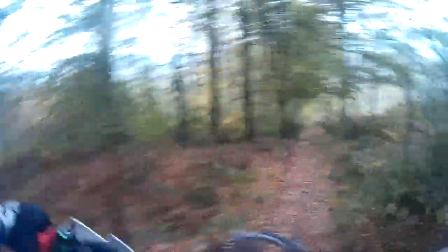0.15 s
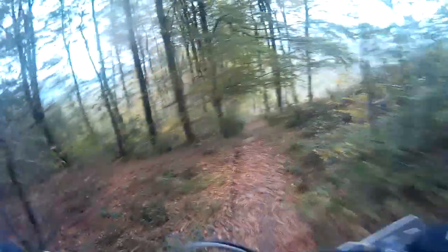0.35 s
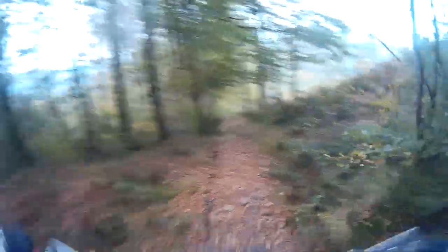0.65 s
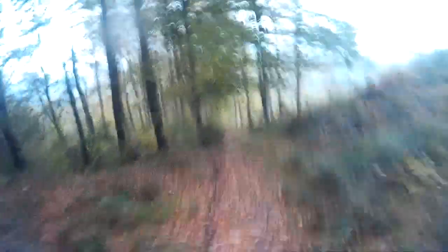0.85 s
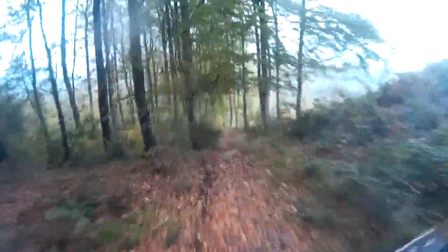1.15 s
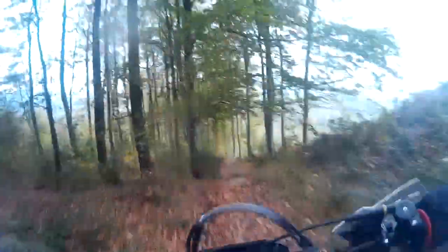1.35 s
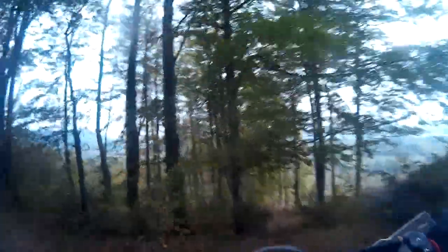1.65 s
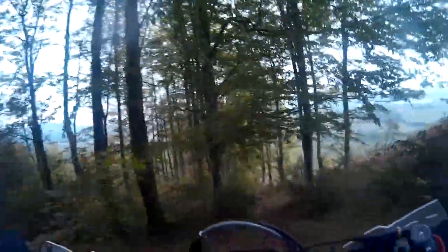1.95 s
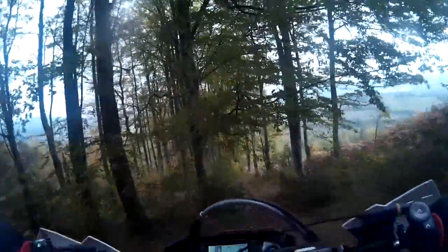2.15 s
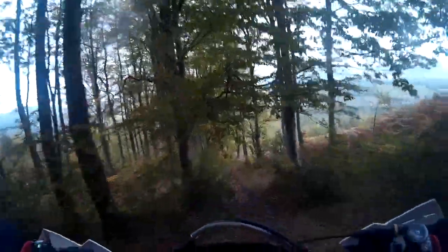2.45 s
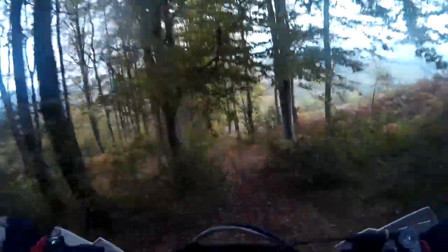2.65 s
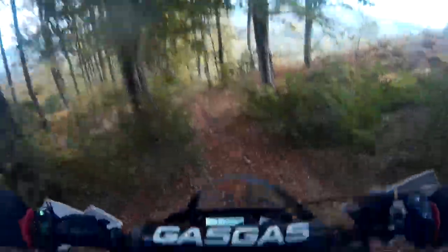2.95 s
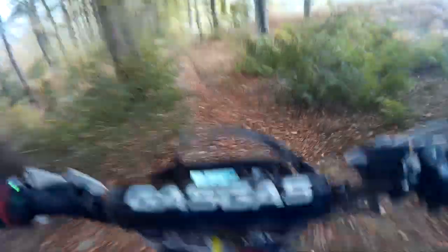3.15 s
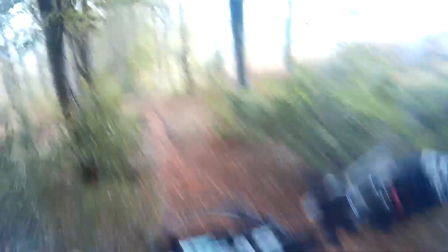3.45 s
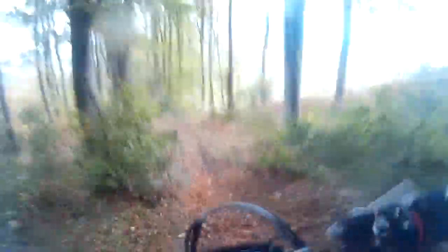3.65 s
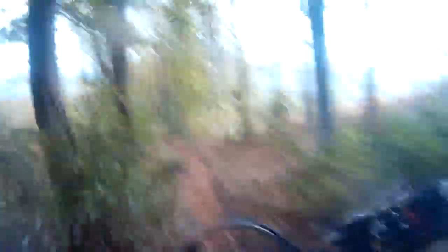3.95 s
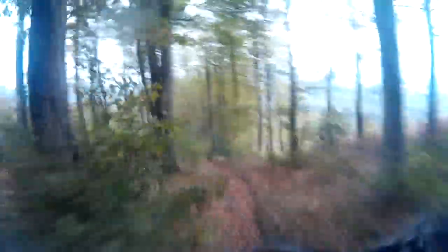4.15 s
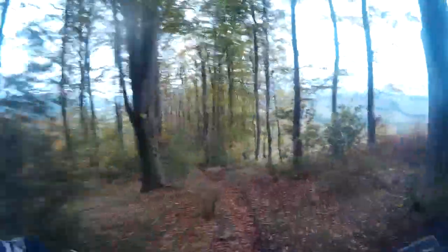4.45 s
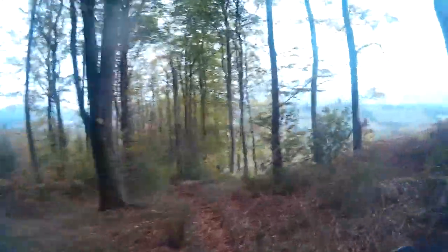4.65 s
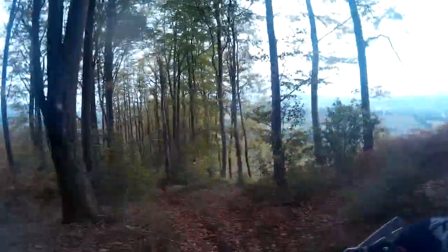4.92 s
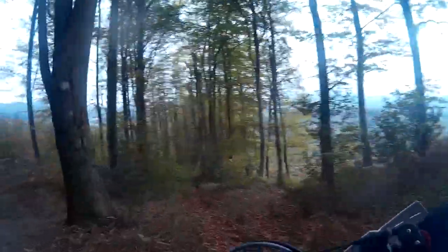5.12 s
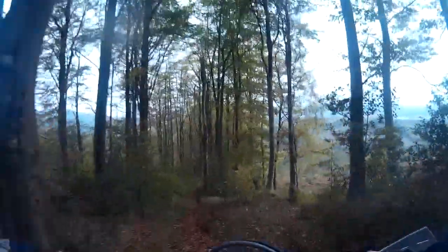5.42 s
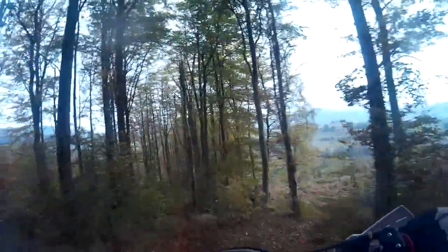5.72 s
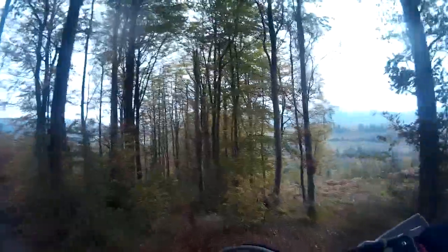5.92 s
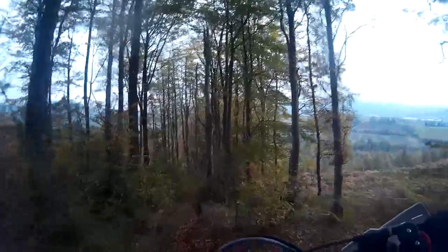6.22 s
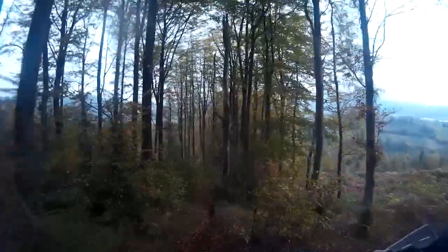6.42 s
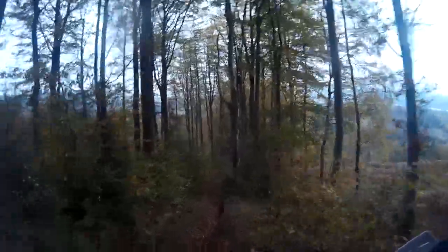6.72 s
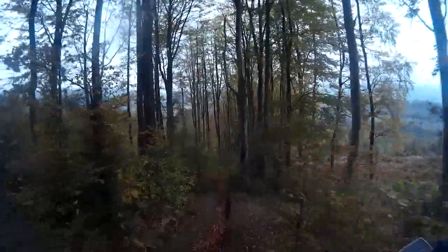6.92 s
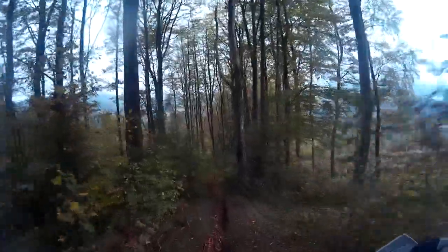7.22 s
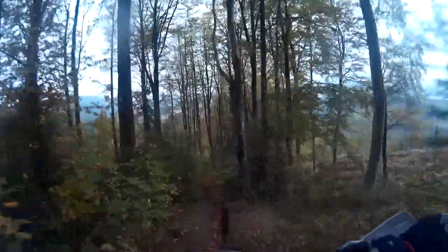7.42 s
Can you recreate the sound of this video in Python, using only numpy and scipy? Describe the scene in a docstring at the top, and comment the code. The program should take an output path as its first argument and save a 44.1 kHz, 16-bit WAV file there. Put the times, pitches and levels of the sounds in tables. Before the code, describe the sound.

Ringing, puffing dirt bike engine at low revs, heard from the helmet, with tyre rumble and short knocks over bumps.

```python
"""A two-stroke dirt bike rings and puffs at low revs, rolling down a woodland trail. Each firing rings
metallically; a dull exhaust puff follows half a turn later. It is heard from a helmet camera in a closed case
that passes mostly a band near 1.3 kHz. Tyres rumble and crunch over soil and leaves, bumps knock and jolt the
case, and the bike groans once in a dip. Early on the engine surges briefly with a rasp, its ring swelling into
brief squeals; later something scrapes once."""
import sys
import numpy as np
from scipy import signal
from scipy.fft import rfft, irfft, next_fast_len
from scipy.io import wavfile

SR = 44100
rng = np.random.default_rng(int(sys.argv[2]) if len(sys.argv) > 2 else 0)


def wrap_up_sound(samples):
    """Save the sound to the file named by the first command line argument, as 16-bit audio."""
    columns = np.atleast_2d(samples).T
    # keep every value between -1 and 1, then stretch to whole-number steps
    tamed = np.clip(columns, -1, 1)
    steps = np.round(tamed * 32767).astype(np.int16)
    wavfile.write(sys.argv[1], SR, steps)


N = 334229
TIME = np.arange(N) / SR

# Crank speed, one firing a turn. Each row: time in seconds, turns per second.
CRANK_SPEED = [(0.0, 28.0), (0.6, 26.32), (0.77, 25.24), (1.1, 31.28), (1.58, 33.1), (1.77, 31.96),
               (2.08, 33.23), (2.72, 27.44), (3.37, 33.44), (3.88, 32.5), (4.39, 36.63), (4.83, 36.64),
               (5.02, 38.6), (5.81, 40.71), (6.29, 36.18), (6.54, 35.11), (6.89, 31.36), (7.58, 33.48)]
# Resonances of the struck case. Each row: centre in Hz, width in Hz, relative gain in dB.
CASE_MODES = [(98, 90, 4), (271, 186, 7), (443, 170, -8.5), (569, 72, -2.5), (727, 64, -3),
              (1060, 620, -2.5), (1408, 150, 7), (1650, 420, 1), (1775, 56, 6.5), (1910, 59, 1.5),
              (2150, 990, -7), (2960, 420, -14.5), (4010, 410, -7), (4640, 450, -14.5), (5640, 680, -16),
              (9350, 3000, -13)]
# Bumps in the trail. Each row: pressure crest in seconds, peak in dB, swing rate in Hz.
BUMPS = [(0.791, -39, 16), (0.881, -41.5, 16), (1.257, -38.5, 18), (2.767, -24, 104), (3.33, -41, 62),
         (3.542, -34.5, 33), (3.88, -40.5, 19), (4.697, -38, 14), (5.02, -39, 26), (5.306, -36.5, 18),
         (6.047, -42, 22), (6.161, -44.5, 19), (7.46, -42.5, 26)]


def amp(db):
    """Decibels to gain."""
    return 10 ** (np.asarray(db) / 20)


def unit(x):
    """Scale to rms 1."""
    return x / np.sqrt(np.mean(x ** 2) + 1e-20)


def curve(rows):
    """Join (seconds, value) rows by straight lines."""
    return np.interp(TIME, *np.transpose(rows))


def bell(centre_s, half_s):
    """Bell-shaped swell of height 1."""
    return np.exp(-np.minimum(((TIME - centre_s) / half_s) ** 2, 20))


def swells(rows):
    """Sum of bells, one per row."""
    return sum(amp(db) * bell(centre_s, half_s) for centre_s, db, half_s in rows)


def add(mix, start_s, sound):
    """Mix a sound in place."""
    part = mix[max(round(start_s * SR), 0):][:len(sound)]
    part += sound[:len(part)]


def noise(spectrum):
    """Noise of rms 1 shaped by (Hz, dB) rows."""
    hz, db = np.transpose(spectrum)
    size = next_fast_len(N, True)
    gain = amp(np.interp(np.log(np.fft.rfftfreq(size, 1 / SR) + 1), np.log(hz), db))
    return unit(irfft(rfft(rng.standard_normal(size)) * gain, size)[:N])


def drift(rate_hz):
    """Smooth random wander of rms 1, rolled off above rate_hz."""
    size = next_fast_len(N, True)
    gain = np.exp(-(np.fft.rfftfreq(size, 1 / SR) / rate_hz) ** 2)
    return unit(irfft(rfft(rng.standard_normal(size)) * gain, size)[:N])


def response(modes, size=4096):
    """Minimum-phase impulse response of a body with steep-sided resonances."""
    bins_hz = np.fft.rfftfreq(size, 1 / SR)
    power = sum((amp(db) / (1 + ((bins_hz - hz) / (0.55 * width_hz)) ** 2)) ** 2
                for hz, width_hz, db in modes)
    cepstrum = irfft(np.log(power + 1e-12))[:size // 2]
    cepstrum[0] /= 2
    return irfft(np.exp(rfft(cepstrum, size)))


def ring(drive, modes):
    """Pass a drive through a resonant body; rms 1."""
    return unit(signal.oaconvolve(drive, response(modes))[:N])


def lowpass(x, hz):
    """First-order treble cut."""
    return signal.lfilter(*signal.butter(1, min(hz, SR / 2.2), fs=SR), x)


def clicks(turns, at_turn, uneven_db, jitter_turns):
    """One click a turn, uneven in strength and timing."""
    strength, slip = rng.standard_normal((int(turns[-1]), 2)).T
    samples = np.searchsorted(turns, np.arange(len(strength)) + at_turn + jitter_turns * slip)
    return np.bincount(np.minimum(samples, N - 1), amp(uneven_db * strength), N)


def gate(turns, at_turn, open_turns):
    """Window that opens once a turn, centred on at_turn."""
    offset_turns = (turns - at_turn + .5) % 1 - .5
    return np.exp(-(offset_turns / (open_turns / 2)) ** 4)


def tone_bursts(turns, hz, waver_hz, at_turn, open_turns, linger):
    """A wavering resonance that restarts each turn and lingers until the next."""
    firing = turns.astype(int)
    cycles = np.cumsum(hz + waver_hz * drift(130)) / SR
    cycles -= cycles[np.searchsorted(firing, firing)]
    envelope = gate(turns, at_turn, open_turns) + linger * np.sqrt(abs(np.sin(np.pi * turns)))
    return unit(envelope * np.sin(2 * np.pi * cycles))


def shaken(half_s=0.063):
    """About 1 at each bump, 0 on level ground."""
    return sum(bell(crest_s, half_s) for crest_s, _, _ in BUMPS)


def going_db(bump_lift_db=1.5):
    """Level that exhaust and tyres share: the going, lifted by bumps."""
    # Each row: time in seconds, base level in dB.
    going = [(0, -57.5), (.9, -54.5), (2.5, -57.5), (3.4, -52.5), (4.1, -55.5), (5.2, -55.5), (6.3, -58),
             (7.58, -57.5)]
    return curve(going) + bump_lift_db * shaken()


def engine_ring(turns, slap_db=-4, gears_db=-11, clatter_db=-7, barrel_db=-2.4, bump_lift_db=2.0):
    """The piston slaps at each firing, the barrel sings and clatters, the gears fill the gaps."""
    # Ring on level ground. Each row: time in seconds, base level in dB.
    ring_levels = [(0.0, -54.5), (0.82, -54), (1.14, -53.5), (1.3, -49.5), (1.86, -48.5), (2.02, -47.5),
                   (2.18, -52.5), (2.5, -50.5), (2.66, -54), (2.74, -51.5), (3.86, -49), (4.1, -52),
                   (4.82, -51), (5.3, -48), (6.98, -54), (7.58, -52.5)]
    # Engine resonances through the case. Each row: centre in Hz, width in Hz, relative gain in dB.
    engine_modes = [(650, 530, -15.5), (1020, 500, -15.5), (1222, 89, 4.5), (1330.6, 37, 7),
                    (1423, 105, 0.5), (1577, 71, 1), (1803, 103, -3.5), (1934, 42, -8), (2274, 74, -17.5),
                    (2462, 84, -15), (2760, 380, -22), (3780, 194, -24)]
    firing_gain = amp(0.62 * rng.standard_normal(int(turns[-1]) + 1))[turns.astype(int)]
    barrel = tone_bursts(turns, hz=1329, waver_hz=20, at_turn=.225, open_turns=.38, linger=.3)
    barrel *= firing_gain * amp(1.4 * drift(160))
    slap = unit(clicks(turns, at_turn=.0532, uneven_db=4.0, jitter_turns=.012))
    burst = unit(gate(turns, at_turn=.2, open_turns=.53) * rng.standard_normal(N))
    clatter = ring(firing_gain * (burst + amp(slap_db) * slap), engine_modes)
    gears = ring(rng.standard_normal(N), engine_modes)
    level_db = curve(ring_levels) + bump_lift_db * shaken() + 0.75 * drift(6.4)
    return amp(level_db) * (amp(barrel_db) * barrel + amp(clatter_db) * clatter + amp(gears_db) * gears)


def exhaust(turns, gain_db=-7.0, puff_db=-2, hum_db=-5, throb_db=5):
    """The port opens half a turn after firing: a ragged puff and a short hum over a low throb."""
    # Pipe resonances. Each row: centre in Hz, width in Hz, relative gain in dB.
    pipe_modes = [(102, 130, -4), (251.5, 40.5, 6), (308.6, 50, -0.5), (476, 130, -13.5)]
    puffs = unit(clicks(turns, at_turn=.5, uneven_db=1.8, jitter_turns=.006))
    gas = unit((gate(turns, at_turn=.7, open_turns=.45) + .2) * rng.standard_normal(N))
    pipe = ring(puffs + .4 * gas, pipe_modes)
    crank_hz = curve(CRANK_SPEED)
    hum_hz = 279.8 - 5.2 * (crank_hz - 31.6)  # sags as the revs rise
    hum = tone_bursts(turns + .5, hum_hz, waver_hz=14, at_turn=.28, open_turns=.54, linger=.35)
    throb = (crank_hz / crank_hz.max()) ** 8 * np.sin(2 * np.pi * turns)
    return amp(going_db() + gain_db) * (amp(puff_db) * pipe + amp(hum_db) * hum + amp(throb_db) * throb)


def trail(rumble_db=2.5, lumpy_db=3.5, lumpy_below_hz=500, ticks_per_s=10, ticks_db=-9):
    """Tyres rumble, unevenly in the bass; small stones and roots tick dully in the case."""
    # Tyres on soil. Each row: frequency in Hz, relative density in dB.
    tyre_spectrum = [(8, 2), (25, 3), (50, -8.5), (110, -15), (200, -14), (400, -18), (600, -23),
                     (800, -28), (1100, -16.5), (2200, -33.5), (5000, -45), (9000, -52)]
    rolling = noise(tyre_spectrum)
    bass = lowpass(rolling, lumpy_below_hz)
    rumble = bass * amp(lumpy_db * drift(13.5)) + rolling - bass
    hits = (rng.random(N) < ticks_per_s / SR) * rng.uniform(0.38, 1, N)
    ticks = unit(lowpass(lowpass(ring(hits, CASE_MODES), 330), 660))
    return amp(going_db()) * (amp(rumble_db) * rumble + amp(ticks_db) * ticks)


def knocks(rebound=0.76, rebound_s=0.0017, rattle=0.03, rattle_s=0.0062, gain_db=1.0):
    """A short blow and a brief rattle ring the case; hard blows rebound."""
    # Each row: start in seconds, peak in dB before gain_db, brightness in Hz.
    blows = [(0.0552, -41, 394), (0.6584, -28, 1080), (0.7916, -29, 770), (0.882, -34.5, 390),
             (0.92, -34, 1460), (1.2576, -29, 540), (1.7393, -41.5, 400), (2.7645, -24.5, 796),
             (2.775, -21, 2270), (3.3165, -11.5, 2030), (3.371, -48, 600), (3.6817, -34.5, 720),
             (4.3185, -38, 400), (4.71, -32, 750), (4.732, -27.5, 1390), (4.8141, -38.5, 400),
             (4.9343, -32.5, 1370), (5.2322, -38, 1020), (5.2771, -36, 400), (5.3108, -30.5, 400),
             (5.826, -38, 443), (6.5774, -34, 1110), (6.6748, -35, 403), (7.2829, -38, 390)]
    out, case = np.zeros(N), response(CASE_MODES)
    age_s = np.arange(len(case)) / SR
    hardest_db = max(db for _, db, _ in blows)
    for start_s, db, bright_hz in blows:
        chatter = rng.standard_normal(len(age_s))
        force = rattle * (chatter - lowpass(chatter, 620)) * np.exp(-age_s / rattle_s)
        add(force, 0, [1])
        add(force, rebound_s, [rebound * amp(db - hardest_db)])
        # a longer contact cuts the treble
        contact = signal.butter(2, min(bright_hz * 1.55, SR / 2.2), fs=SR)
        ringing = signal.fftconvolve(force, case)
        knock = lowpass(signal.lfilter(*contact, ringing), bright_hz * 3)
        add(out, start_s, -knock * amp(db + gain_db) / abs(knock).max())
    return out


def friction(modes, grain_db):
    """Grainy stick-slip noise through resonances; rms 1."""
    return ring(rng.standard_normal(N) * amp(grain_db * drift(180)), modes)


def rasps():
    """Brief rasps ringing mostly near 1.4 kHz: one as the engine surges, a later short scrape."""
    # Each row: centre in seconds, level in dB, half length in seconds.
    rasp_swells = [(.292, -40.5, 0.071), (3.458, -46, 0.051)]
    # Scrape resonances. Each row: centre in Hz, width in Hz, relative gain in dB.
    rasp_modes = [(1200, 120, -19), (1383, 200, 7), (1550, 410, -2), (1740, 140, -6), (2350, 220, -17),
                  (3100, 280, -32), (3840, 320, -29), (4510, 280, -26.5)]
    return swells(rasp_swells) * friction(rasp_modes, grain_db=-2.0)


def squeals(hz=1345, waver_hz=28, flutter_db=2):
    """The engine's metallic ring swells into brief squeals near 1.35 kHz during the early engine surge."""
    # Each row: centre in seconds, level in dB, half length in seconds.
    squeal_swells = [(.229, -36.5, 0.0079), (.282, -35, 0.02), (.365, -37, 0.015), (.408, -48, 0.018)]
    cycles = np.cumsum(hz + waver_hz * drift(107)) / SR
    return swells(squeal_swells) * unit(np.sin(2 * np.pi * cycles) * amp(flutter_db * drift(200)))


def crunches():
    """Leaves and twigs crush under the tyres."""
    # Each row: centre in seconds, level in dB, half length in seconds.
    crushes = [(.718, -60, 0.018), (3.095, -47.5, 0.01), (3.155, -45, 0.006), (3.198, -59, 0.028),
               (4.44, -62.5, 0.15)]
    # Leaf and twig resonances. Each row: centre in Hz, width in Hz, relative gain in dB.
    litter_modes = [(756, 460, 5), (1590, 580, 12), (2380, 130, 3), (3050, 260, 1.5), (3900, 170, -1),
                    (4700, 400, -14)]
    return swells(crushes) * friction(litter_modes, grain_db=4.5)


def jolts():
    """Each bump gives the air in the case one slow push and pull."""
    out = np.zeros(N)
    for crest_s, db, hz in BUMPS:
        swing = 4 * hz * (TIME - crest_s) - 1  # push at -1, pull at +1
        out -= amp(db) * swing * np.exp((1 - swing ** 2) / 2)
    return out


def groan():
    """A short, low, mostly falling tone as the bike dips."""
    # Each row: time in seconds, pitch in Hz, level in dB.
    glide = [(3.13, 135, -81), (3.165, 113, -47), (3.195, 92, -46), (3.225, 89.5, -47), (3.265, 100, -63)]
    times_s, hz, db = np.transpose(glide)
    cycles = np.cumsum(np.interp(TIME, times_s, hz)) / SR
    sounding = (TIME > times_s[0]) & (TIME < times_s[-1])
    return amp(np.interp(TIME, times_s, db)) * sounding * np.sin(2 * np.pi * cycles)


def scene():
    """Engine, exhaust and trail at the rider's helmet; mono."""
    turns = np.cumsum(curve(CRANK_SPEED)) / SR
    rubbing = rasps() + crunches()
    bike = engine_ring(turns) + exhaust(turns)
    return (bike + trail() + knocks() + jolts() + rubbing + squeals() + groan())[None]


def record(dry, hiss_db=-72, whine_db=-96, whine_hz=11861, cutoff_hz=15750):
    """The camera adds hiss and a thin whine, then limits the band."""
    # Microphone hiss. Each row: frequency in Hz, relative density in dB.
    hiss_spectrum = [(20, -61), (3000, -2.5), (7000, -3.5), (15000, -4)]
    hiss = amp(hiss_db) * noise(hiss_spectrum)
    whine = amp(whine_db) * np.sin(2 * np.pi * whine_hz * TIME)
    band_limit = signal.firwin(511, cutoff_hz, window=("kaiser", 9), fs=SR)
    return signal.oaconvolve(dry + hiss + whine, band_limit[None], "same")


dry = scene()
out = record(dry)
wrap_up_sound(out)
```